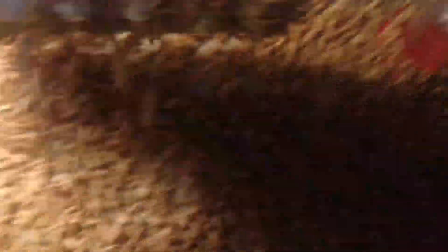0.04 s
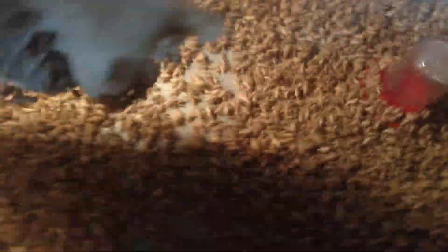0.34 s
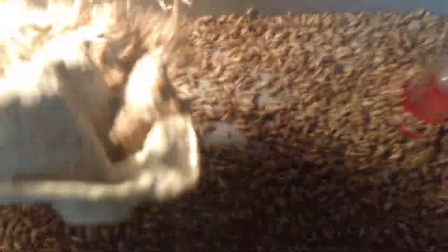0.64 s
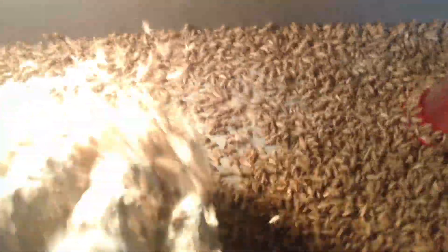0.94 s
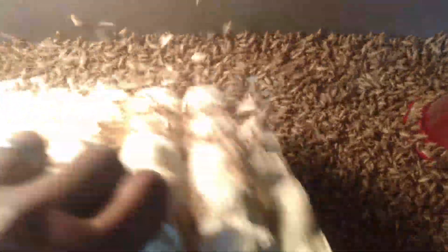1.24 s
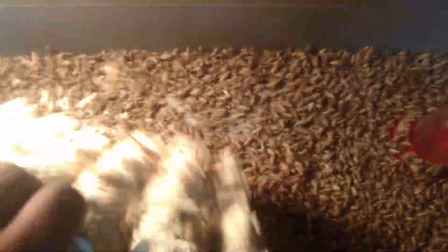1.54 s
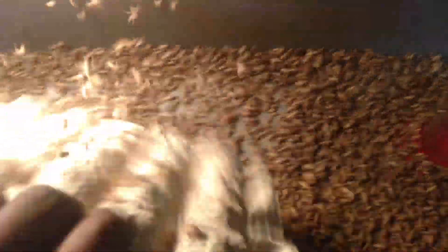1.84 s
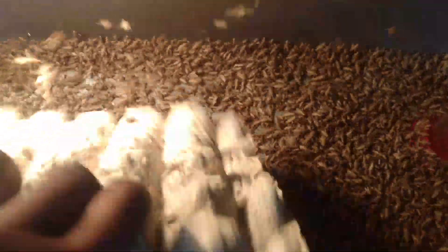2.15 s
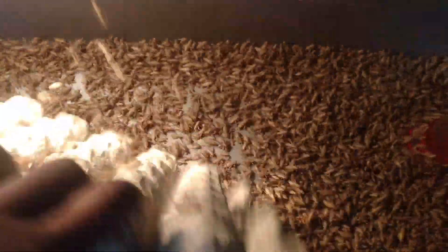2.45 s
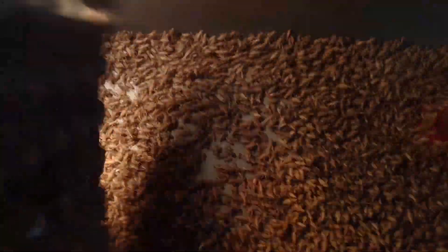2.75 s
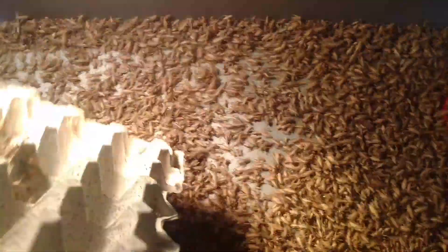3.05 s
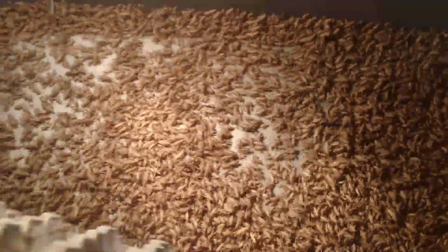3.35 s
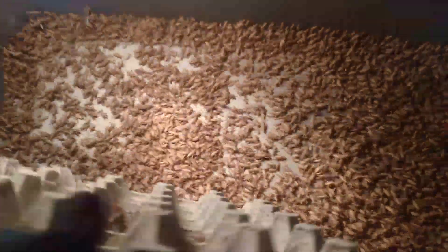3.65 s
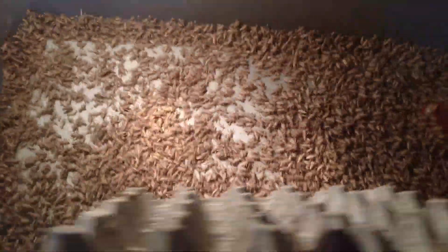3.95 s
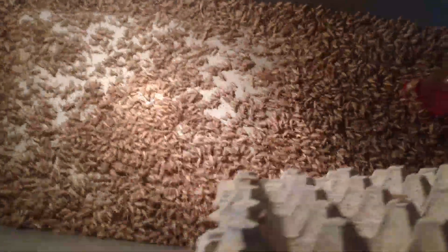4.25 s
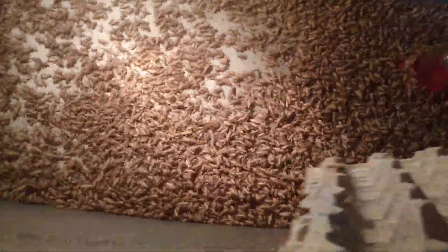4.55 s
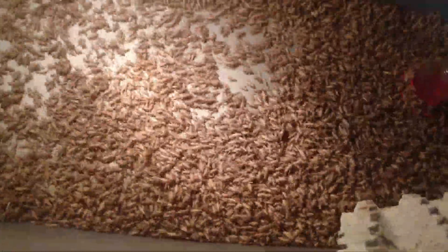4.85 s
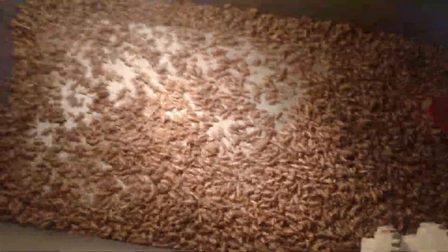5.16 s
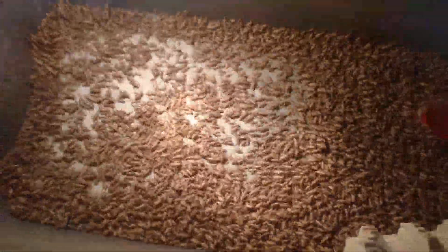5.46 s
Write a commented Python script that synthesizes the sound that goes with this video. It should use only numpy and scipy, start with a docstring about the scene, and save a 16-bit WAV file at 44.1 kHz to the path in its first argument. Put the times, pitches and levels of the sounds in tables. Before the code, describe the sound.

Indoors, a pulp egg tray scuffs and bumps as clumps of insects spill from it, rustling and ticking against a plastic bin right by the microphone. About halfway through, the spilling thins to a light scrabble. A steady fan, muffled at first, grows clearer, and countless crickets chirp shrilly around the room, a few near ones standing out. The sound is slightly hollow.

```python
"""Crickets patter and scrabble in a plastic bin close to the microphone, shaken from an egg carton
whose pulp board scuffs and bumps. As the carton is taken away, the room behind it comes forward:
the rush and hum of a ventilation fan, and countless crickets chirping with strokes of their wings.
The microphone has two closely spaced ports, each subtracted from the other."""
import sys
import numpy as np
from scipy import signal
from scipy.fft import rfft, irfft
from scipy.io import wavfile
from scipy.ndimage import uniform_filter1d

SR = 44100
rng = np.random.default_rng(int(sys.argv[2]) if len(sys.argv) > 2 else 0)


def log_audio(samples):
    """Write samples as a 16-bit WAV file to the path given in sys.argv[1]."""
    # one column per channel
    frames = np.atleast_2d(samples).T
    # limit to full scale, then quantise
    limited = np.clip(frames, -1, 1)
    pcm = np.round(limited * 32767).astype(np.int16)
    wavfile.write(sys.argv[1], SR, pcm)


N = 252252
TIME, FREQS = np.arange(N) / SR, np.fft.rfftfreq(N, 1 / SR)
PORT_DELAY_SAMPLES = 17.15   # travel time from one microphone port to the other


def from_db(db):
    """Decibels to gain."""
    return 10 ** (np.asarray(db) / 20)


def unit_power(x):
    """Scale to unit power."""
    return x / np.sqrt(np.mean(x ** 2) + 1e-20)


def gain_curve(rows):
    """Gain over time from (s, dB) rows."""
    return from_db(np.interp(TIME, *np.transpose(rows)))


def response(points):
    """Gain over frequency from (Hz, dB) points."""
    hz, db = np.transpose(points)
    return from_db(np.interp(np.log(FREQS + 1), np.log(hz), db))


def colour(x, spectrum):
    """Shape a white signal, keeping its power."""
    return irfft(rfft(x) * unit_power(response(spectrum)), N)


def band(x, low_hz, high_hz):
    """Keep one frequency range; neighbouring ranges add up to the whole power."""
    below = lambda hz: 1 / (1 + (FREQS / hz) ** 12)
    return irfft(rfft(x) * np.sqrt(abs(below(high_hz) - below(low_hz))), N)


def white():
    """Unrelated noise at the two ports."""
    return rng.standard_normal((2, N))


def drift(rate_hz):
    """A slow random wander of spread 1."""
    return unit_power(irfft(rfft(rng.standard_normal(N)) / (1 + (FREQS / rate_hz) ** 2), N))


def resonate(x, hz, width_hz):
    """One resonance, gain 1 at its peak."""
    r = np.exp(-np.pi * width_hz / SR)
    feedback = [1, -2 * r * np.cos(2 * np.pi * hz / SR), r * r]
    return signal.lfilter(np.array([1, 0, -1]) * (1 - r * r) / 2, feedback, x)


def swell(s, rise_s, tail=2.13):
    """A hump that peaks at time s and takes tail times as long to fall as to rise."""
    hump = np.zeros(N)
    near = slice(*np.searchsorted(TIME, [s - 4 * rise_s, s + 4 * rise_s * tail]))
    u = (TIME[near] - s) / rise_s
    hump[near] = np.exp(-2 * np.where(u < 0, -u, u / tail) ** 1.5)
    return hump


def grains(per_s, spread_db, ring_s):
    """Tiny random impacts of uneven size, each scattered into a short burst by the bin walls."""
    hits = rng.random(N) < per_s / SR
    sizes = from_db(spread_db * np.minimum(rng.exponential(1, N), 4))
    energy = signal.lfilter([1], [1, -np.exp(-1 / (ring_s * SR))], hits * sizes ** 2)
    return unit_power(np.sqrt(energy) * white())


def knock(noise, s, db, rise_s, hz, width_hz, tail=1.5):
    """A brief contact of set strength, heard through a damped resonance."""
    hump = swell(s, rise_s, tail)
    ring = hump * resonate(resonate(noise, hz, width_hz), hz, width_hz)
    return from_db(db) * ring * np.sqrt(np.sum(hump ** 2) / (np.sum(ring ** 2) + 1e-20))


# Swings of the carton over the bin.
# Each row: peak in seconds, spill level in dB, scuff level in dB, rise in seconds.
CARTON_SWINGS = [(0.01, -33, -56, 0.028), (0.39, -36.5, -47, 0.35), (0.772, -30.5, -37.5, 0.25),
                 (0.96, -27.5, -58, 0.18), (1.3, -27, -36, 0.066), (1.65, -29.5, -42, 0.44),
                 (1.874, -26, -35.5, 0.094), (2.403, -31.5, -49, 0.17), (3.056, -28.5, -52, 0.12),
                 (3.564, -31.5, -60, 0.077)]


def swings():
    """Each swing spills insects and rubs the board: two gains over time, overlaps adding in power."""
    power = sum((from_db([[spill_db], [scuff_db]]) * swell(s, rise_s, tail=3.2)) ** 2
                for s, spill_db, scuff_db, rise_s in CARTON_SWINGS)
    return np.sqrt(power)


# Clumps of insects thrown off by jerks of the wrist, landing close to the microphone.
# Each row: peak in seconds, level in dB, rise in seconds, treble against middle in dB.
LANDING_CLUMPS = [(0.01, -31.5, 0.021, 1), (0.084, -30, 0.012, 7), (0.325, -31.5, 0.014, -1),
                  (0.35, -31, .009, 1), (0.437, -32, .012, 0), (0.468, -39, 0.013, 6), (0.5, -36, 0.016, 0),
                  (0.75, -44, 0.01, -2), (0.817, -29, .012, -1), (0.945, -21.5, .007, 0),
                  (0.96, -22.5, 0.008, -2), (0.973, -25, .006, -3), (1, -31, .007, 5),
                  (1.02, -20.5, .007, 2), (1.027, -22, 0.01, -9), (1.071, -24, .007, -7),
                  (1.082, -26, 0.0064, 11), (1.13, -26.5, 0.016, -2), (1.174, -27.5, 0.0062, -9),
                  (1.452, -26, 0.0072, -3), (1.486, -31, 0.016, 3), (1.517, -28, 0.015, -3),
                  (1.578, -22.5, 0.011, -2.5), (1.601, -25.5, 0.0062, -1), (1.64, -22, 0.0081, -1.5),
                  (1.693, -20.5, 0.0079, -2.5), (1.707, -23, 0.0073, 0), (1.74, -27, 0.01, -3),
                  (1.754, -23, 0.0085, 1), (1.796, -25.5, 0.0086, 0), (1.853, -24.5, 0.0083, -4),
                  (1.881, -23.5, 0.011, 7), (1.907, -22, .007, 2), (1.918, -21, 0.0052, -2),
                  (1.953, -22, 0.0057, 6), (1.98, -24.5, 0.007, 3), (2.003, -23, .008, -4),
                  (2.034, -21.5, 0.015, -2), (2.054, -24, .008, 1), (2.095, -23, 0.015, 0),
                  (2.148, -21, 0.0092, -5.5), (2.168, -25, 0.004, 3), (2.224, -28, 0.0091, -2),
                  (2.268, -23, 0.0065, -2), (2.281, -32, 0.0036, 5), (2.32, -30, 0.0056, 5),
                  (2.338, -29.5, 0.0075, 14), (2.367, -31, .01, 12), (2.399, -21, 0.0029, 4),
                  (2.437, -27.5, 0.0075, -4), (2.462, -23, 0.0076, -5.5), (2.522, -20.5, 0.0034, 3),
                  (2.574, -24, 0.0048, 1), (2.588, -24.5, 0.0036, 3), (2.63, -30.5, .005, -7),
                  (2.71, -20.5, 0.0032, -4), (2.746, -27.5, 0.0028, 8), (2.99, -25.5, 0.016, 2),
                  (3.01, -24.5, 0.017, 1), (3.165, -29, 0.014, -4)]


def landings(scatter_s=0.0026):
    """Middle and treble gains of the landing clumps; stragglers spread each one's energy in time."""
    power = 0
    for s, db, rise_s, tilt_db in LANDING_CLUMPS:
        gains = from_db([[db - tilt_db / 2], [db + tilt_db / 2]])
        spread_s = rise_s + scatter_s
        power += rise_s / spread_s * (gains * swell(s, spread_s)) ** 2
    return np.sqrt(power)


# The rustle in the bin, heard close up. Each row: frequency in Hz, relative level in dB.
BIN_RUSTLE = [(100, -75), (600, -9.5), (1600, -6), (2400, 1), (3300, 2), (4200, -3.5), (6300, -0.5),
              (8000, -5.5), (9500, -8.5), (11000, -15.5), (13000, -18), (15000, -28)]
# Sharp ticks on the bin wall. Each row: peak in seconds, level in dB, pitch in Hz, rise in seconds.
WALL_TICKS = [(0.438, -32, 4000, .003), (0.913, -17, 3300, 0.0033), (0.962, -19, 3300, .002),
              (1.032, -22, 3080, 0.0037), (1.098, -13.5, 4100, 0.0037), (1.381, -11.5, 4300, 0.0039),
              (2.042, -10.5, 3630, 0.0037), (2.358, -16, 3400, 0.0049), (2.41, -21, 3700, .004),
              (2.827, -23.5, 4800, 0.025), (3.014, -29, 3700, .006), (3.089, -30, 3460, 0.0027)]


def insects(spill, scrabble_db=-37, settle_db_per_s=2, flurry_db=1.9):
    """Dry bodies and legs tick on board and plastic, in clumps and in flurries that slowly settle."""
    scrabble = from_db(scrabble_db - settle_db_per_s * TIME)
    flurries = np.hypot(scrabble, spill) * from_db(flurry_db * drift(rate_hz=21))
    patter = flurries * grains(per_s=6400, spread_db=1.5, ring_s=0.0047)
    middle, treble = landings()
    body_top_hz, leg_top_hz = 4720, 8150   # bodies ring in the middle, legs and wings in the treble
    bands = [(middle, 1, body_top_hz), (treble, body_top_hz, leg_top_hz), (treble, leg_top_hz, SR)]
    for gain, low_hz, high_hz in bands:
        patter += gain * band(grains(per_s=3500, spread_db=3.5, ring_s=0.00045), low_hz, high_hz)
    contact = white()
    ticks = sum(knock(contact, s, db, rise_s, hz, width_hz=4100, tail=0.28)
                for s, db, hz, rise_s in WALL_TICKS)
    return colour(patter, BIN_RUSTLE) + ticks


# Pulp board rubbing near the microphone. Each row: frequency in Hz, relative level in dB.
BOARD_SCUFF = [(40, -60), (140, -7.5), (300, -13), (600, -6.5), (900, -6), (1400, -2.5), (2200, -24.5),
               (5000, -79), (15000, -50)]
# Soft bumps and scrapes of the carton. Each row: peak in seconds, level in dB, pitch in Hz,
# rise in seconds, bandwidth as a share of the pitch.
CARTON_BUMPS = [(0.081, -31.5, 290, 0.012, 0.95), (0.662, -36, 1200, 0.034, 0.056),
                (0.716, -35, 680, .012, 0.42), (0.772, -29, 560, 0.014, 1), (1.323, -24, 990, 0.013, .5),
                (1.363, -30, 940, 0.023, .6), (1.691, -36, 900, 0.0092, .83),
                (1.752, -28, 280, 0.0085, 2.2), (2.354, -22, 1550, 0.0032, 1), (2.761, -29, 160, 0.013, 2),
                (2.794, -35, 78.6, 0.035, .83), (2.813, -25.5, 487, 0.0058, 1.5),
                (2.82, -31, 140, 0.047, 0.79), (4.802, -25, 720, 0.0092, 0.79),
                (4.819, -26.5, 188, 0.026, 0.89), (5.265, -33.5, 180, 0.015, 0.97)]


def carton(rub):
    """Soft pulp scuffs in dull grains and, when bumped or scraped, gives a damped, hollow note."""
    scuff = rub * colour(grains(per_s=3300, spread_db=3.0, ring_s=0.0015), BOARD_SCUFF)
    contact = white()
    bumps = sum(knock(contact, s, db, rise_s, hz, share * hz)
                for s, db, hz, rise_s, share in CARTON_BUMPS)
    return scuff + bumps


# How freely the fan reaches the microphone past the carton. Each row: time in seconds, gain in dB.
FAN_OPENNESS = [(0.0, -5.5), (0.25, -9), (0.7, -4), (1.4, -7.5), (2.3, -6), (3.0, -2), (3.7, 0.5),
                (5.72, 0.5)]
# The fan's rushing air, out in the room. Each row: frequency in Hz, relative level in dB.
AIR_RUSH = [(25, -26), (45, -23), (70, -19), (105, 1), (170, -6.5), (240, -3), (330, -1.5), (520, 1.5),
            (800, -1), (1250, -4), (1700, -5.5), (3300, -9.5), (6300, -10), (8000, -16.5), (9200, -14.5),
            (11000, -25), (15000, -25.5)]
# Ringing of fan and housing. Each row: pitch in Hz, width in Hz, level in dB against the rush.
HOUSING_TONES = [(296.2, 18.6, -8), (483.6, 4.4, -15.5), (800, 18.4, -9.5), (1263, 34, -12)]
# The motor's low hum. Each row: pitch in Hz, width in Hz, unshielded level in dB.
MOTOR_HUM = [(92.5, 5.3, -61), (140.5, 13.6, -47)]


def fan(open_db=-34, tone_shielding=0.64, hum_shielding=0.52):
    """Rushing air, wavering tones and motor hum; behind the carton the tones sink most, the hum least."""
    air, openness = white(), gain_curve(FAN_OPENNESS)
    tones = sum(from_db(db) * unit_power(resonate(air, hz, width)) for hz, width, db in HOUSING_TONES)
    hum = sum(from_db(db) * unit_power(resonate(air, hz, width)) for hz, width, db in MOTOR_HUM)
    rush = colour(white(), AIR_RUSH)
    airflow = from_db(open_db) * (rush + openness ** tone_shielding * tones)
    return openness * airflow + openness ** hum_shielding * hum


def chirp(hz, spacing_s, fall, sag=0, stroke_s=0.015, overtone_db=-27, rasp_share=0.3, rasp_s=0.002):
    """Three wing strokes, each falling in pitch as the wings slow; a tired chirp sags and turns raspy."""
    t = np.arange(int(3 * spacing_s * SR)) / SR
    stroke = np.minimum(t % spacing_s / min(stroke_s, spacing_s), 1)
    jitter = rng.standard_normal(100)
    rasp = rasp_share * np.interp(t / rasp_s, np.arange(len(jitter)), jitter)
    pitch_hz = hz * (1 + fall * (0.5 - stroke) - sag * (t / t[-1] + rasp))
    phase = 2 * np.pi * np.cumsum(pitch_hz) / SR
    return np.sin(np.pi * stroke) * (np.sin(phase) + from_db(overtone_db) * np.sin(2 * phase))


def add(track, s, sound):
    """Mix a sound in at time s; a start outside the track wraps round."""
    start = int(s * SR) % N
    track[start:start + len(sound)] += sound[:N - start]


def room(x, t60_s, direct_db):
    """Direct sound from a random direction, reaching each port in its own time, plus a diffuse tail."""
    t = TIME[:SR // 3]
    echo = rng.standard_normal((2, len(t))) * from_db(-60 * t / t60_s)
    echo /= np.sqrt(np.sum(echo ** 2) / 2)
    arrivals = rng.integers(0, int(PORT_DELAY_SAMPLES), 2)
    echo[[0, 1], arrivals] += from_db(direct_db)
    return signal.fftconvolve(x[None], echo, axes=1)[:, :N] / np.hypot(1, from_db(direct_db))


# The chorus around the room comes out from behind the carton. Each row: time in seconds, gain in dB.
CHORUS_EMERGENCE = [(0, -14.5), (2.6, -11.5), (2.76, -7), (2.86, -8.5), (3.12, -8), (3.28, -3), (3.6, -4),
                    (3.76, -2.5), (5.72, -3.5)]
# Its mean pitch wanders as voices join and leave. Each row: time in seconds, pitch in Hz.
CHORUS_MEAN_PITCH = [(3.25, 4980), (3.4, 4860), (3.55, 5010), (4.1, 4880), (4.42, 5050), (4.65, 4860),
                     (4.82, 5010), (4.95, 4910), (5.27, 4950), (5.43, 5060), (5.52, 4900), (5.68, 4980)]
# Its level dips briefly. Each row: centre in seconds, change in dB, length of each slope in seconds.
CHORUS_DIPS = [(3.355, -4, .018), (3.576, -4, .014), (4.123, -4, 0.031), (4.68, -2, 0.04), (4.82, -5, .012),
               (5.165, -17, 0.018), (5.212, -6, 0.014), (5.48, -9, .016), (5.545, -5, 0.018),
               (5.61, -4, .014)]
# The crickets nearest the microphone. Each row: start in seconds, level in dB, starting pitch in Hz,
# share of pitch lost (negative rises), seconds between wing strokes.
NEAR_CHIRPS = [(3.24, -23, 5080, 0.014, .013), (3.404, -34, 4530, .14, 0.016),
               (3.53, -23, 5120, 0.057, .012), (3.712, -25, 5020, 0.0044, .012),
               (3.765, -21, 5090, .03, 0.011), (3.885, -21, 4980, 0.029, .015),
               (3.925, -34, 4450, 0.064, 0.024), (4.0, -19, 5180, 0.036, 0.0093),
               (4.024, -32, 4430, 0.037, 0.019), (4.135, -29, 4980, -0.015, .012),
               (4.225, -28, 5130, .01, .015), (4.288, -21.5, 5130, 0.0023, .015),
               (4.34, -20, 5050, .02, .012), (4.385, -22, 5120, 0.056, .011),
               (4.555, -17, 5000, 0.011, 0.013), (4.598, -20, 5010, .03, 0.01),
               (4.62, -35, 4250, 0.093, 0.01), (4.78, -24, 5170, -0.049, 0.012),
               (4.845, -18, 5210, 0.053, 0.0098), (4.847, -32, 4500, 0.07, 0.011),
               (4.925, -20, 4910, -0.0088, 0.012), (5.02, -22, 5200, .02, 0.013),
               (5.078, -23, 4990, 0.025, 0.0089), (5.112, -21, 5040, .03, 0.011),
               (5.178, -20, 5020, .03, 0.008), (5.245, -21, 5060, 0.019, 0.01),
               (5.297, -20, 4940, 0.019, .01), (5.395, -23, 5300, 0.00064, .016),
               (5.488, -20, 5100, -0.00026, 0.011), (5.49, -25.5, 4590, 0.06, 0.011),
               (5.54, -32.5, 4250, 0.063, 0.016), (5.568, -23, 5140, 0.041, 0.013),
               (5.65, -22, 5110, -0.0044, 0.017)]


def chorus(count=700, place_count=6, crowd_db=-24, scatter_hz=220, spread_db=0.8, flutter_db=0.2):
    """Males chirp independently, each at its own pitch, from around the room; the nearest stand out."""
    places, nearest = np.zeros((place_count, N)), np.zeros(N)
    for k, (when, pitch, size, pace) in enumerate(rng.standard_normal((count, 4))):
        s = (k + when) / count * N / SR
        hz = np.interp(s, *np.transpose(CHORUS_MEAN_PITCH)) + scatter_hz * np.tanh(pitch)
        voice = chirp(hz, spacing_s=0.038 * np.exp(0.124 * pace), fall=0.13)
        add(places[k % place_count], s, from_db(spread_db * size) * voice)
    for s, db, hz, sag, spacing_s in NEAR_CHIRPS:
        add(nearest, s, from_db(db) * chirp(hz, spacing_s, fall=0.066, sag=sag))
    crowd = sum(room(place, t60_s=0.14, direct_db=-3) for place in places)
    running_power = uniform_filter1d(np.mean(crowd ** 2, axis=0), SR // 12)
    crowd /= np.sqrt(running_power + 1e-9)
    # the chorus level flutters slightly and dips briefly at set times
    flutter = flutter_db * drift(rate_hz=21)
    dips = sum(db * swell(s, slope_s, tail=1) for s, db, slope_s in CHORUS_DIPS)
    crowd *= gain_curve(CHORUS_EMERGENCE) * from_db(crowd_db + flutter + dips)
    return crowd + room(nearest, t60_s=0.07, direct_db=-14)


def ports(x, shade_db):
    """The microphone housing shades the second port, more for some directions than others."""
    return x * unit_power(from_db([[0], [shade_db]]))


def scene():
    """The bin close in front, the chorus and the fan farther off, as they reach the two ports."""
    spill, rub = swings()
    close_up = ports(insects(spill) + carton(rub), shade_db=-4.5)
    return close_up + ports(chorus(), shade_db=-8.5) + ports(fan(), shade_db=-3.5)


# How much of the other port is subtracted. Each row: frequency in Hz, gain in dB (capped at 0 in use).
PORT_CROSSFEED = [(200, -2), (700, -9.5), (1250, -2), (2300, -9), (2700, 4), (3000, -11.5), (3900, 3.5),
                  (5200, -5), (6500, -11.5), (7800, -8), (9100, -13.5), (10400, -4), (11700, 9),
                  (13000, -1)]
# Long waves reach both ports alike, so their difference is small. Each row: frequency in Hz, gain in dB.
SIDE_RESPONSE = [(40, -7.5), (150, -10.5), (400, -8), (750, -10.5), (1400, 2.5), (4000, 0.5)]


def record(dry):
    """The microphone subtracts from each port the delayed other one, combing sum and difference in turn."""
    left, right = rfft(dry)
    delay = np.exp(-2j * np.pi * FREQS * PORT_DELAY_SAMPLES / SR)
    crossfeed = np.minimum(response(PORT_CROSSFEED), 1) * delay
    to_mid = 1 - crossfeed
    to_side = (1 + crossfeed) * response(SIDE_RESPONSE)
    equaliser = 1 / np.sqrt(2 * (abs(to_mid) ** 2 + abs(to_side) ** 2))
    # a steady, deep notch near 2.5 kHz in the mid channel makes the sound hollow
    notch_hz, notch_width_hz, notch_db = 2484, 156, -33
    notch = from_db(notch_db * np.exp(-((FREQS - notch_hz) / notch_width_hz) ** 2))
    mid = (left + right) * to_mid * notch
    side = (left - right) * to_side
    stereo = irfft(np.array([mid + side, mid - side]) * equaliser, N)
    top_cut = signal.ellip(12, 0.1, 90, 15300, fs=SR, output="sos")   # steep, above 15.3 kHz
    return signal.sosfilt(top_cut, stereo)


dry = scene()
out = record(dry)
log_audio(out)
```